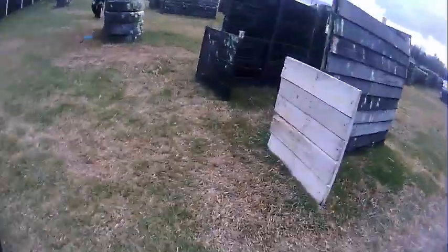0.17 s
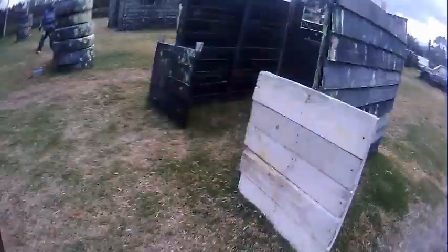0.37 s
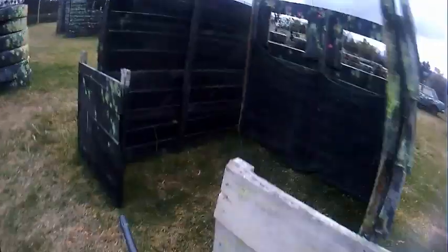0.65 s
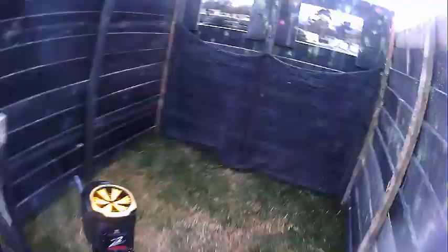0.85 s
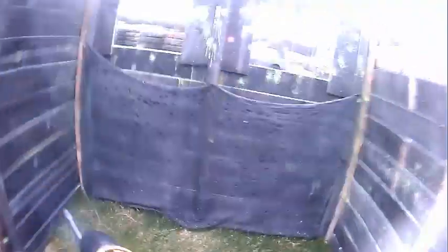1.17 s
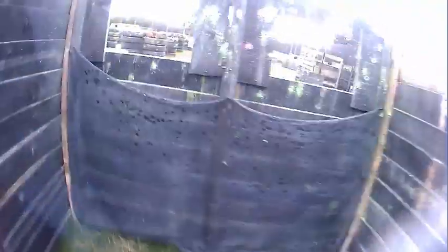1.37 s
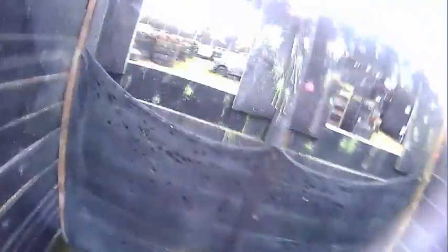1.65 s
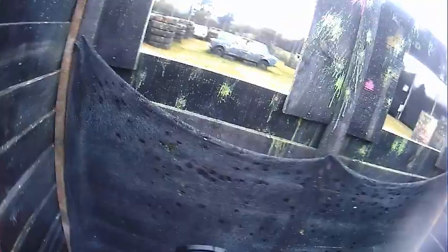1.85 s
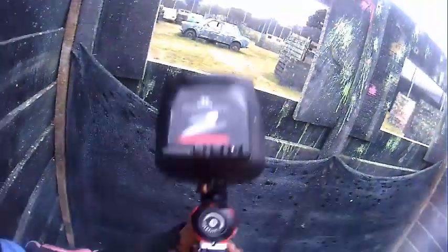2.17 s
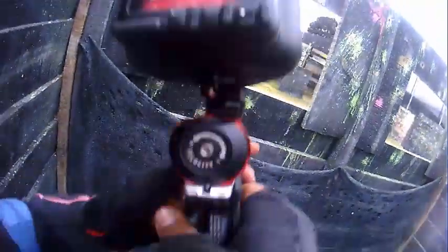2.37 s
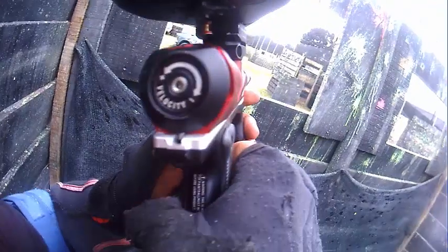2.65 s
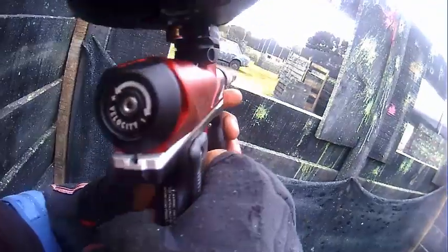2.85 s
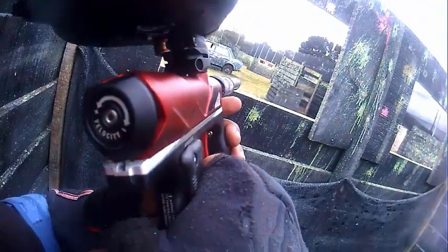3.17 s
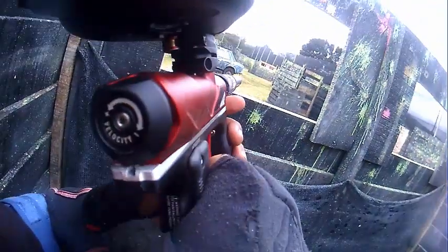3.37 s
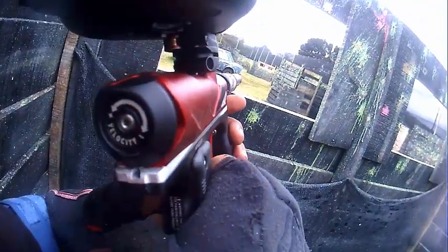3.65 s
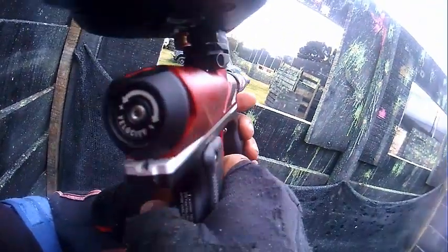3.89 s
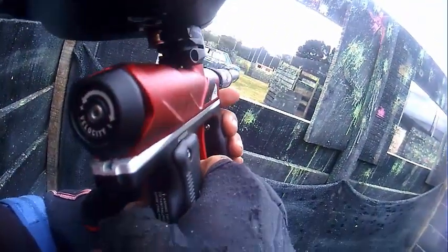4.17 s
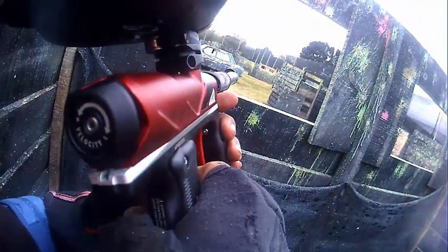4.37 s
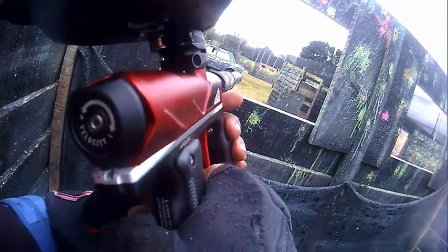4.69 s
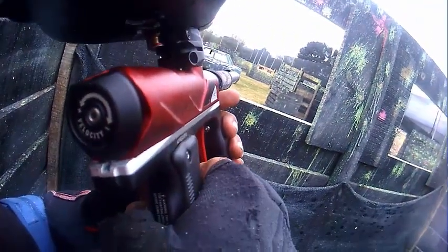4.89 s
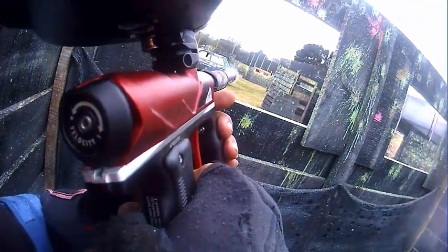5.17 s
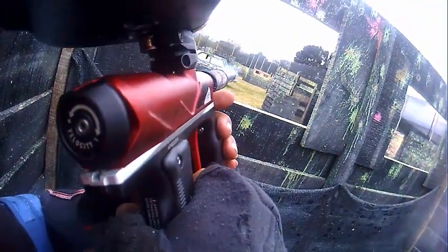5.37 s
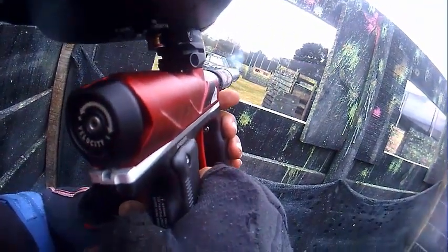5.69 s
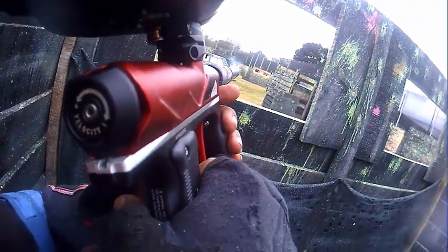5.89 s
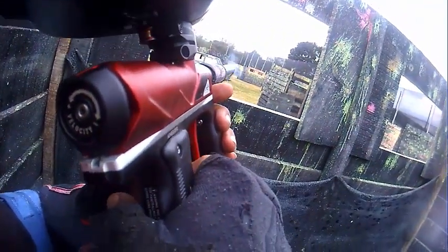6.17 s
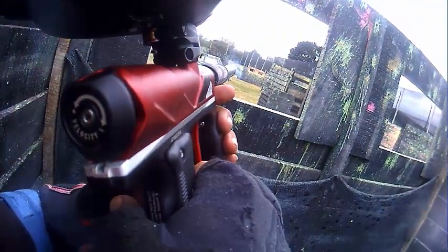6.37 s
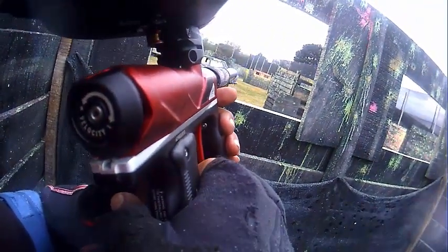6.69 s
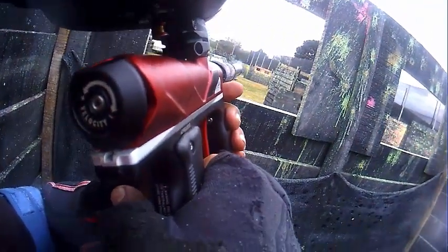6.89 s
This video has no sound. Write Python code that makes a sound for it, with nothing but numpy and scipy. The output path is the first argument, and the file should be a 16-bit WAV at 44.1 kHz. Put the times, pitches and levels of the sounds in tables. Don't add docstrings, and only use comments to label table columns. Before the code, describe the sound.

Outdoors, then within a small wooden hut. Gritty rubbing and thumps on the microphone's case come first, easing while far-off paintball shots tap softly in even bursts. Strap clicks peak as the marker is raised, then it is nearly still with light wind. Finally the near marker hammers out a rapid string until the end, each shot a short low thump with metallic clank and hiss, in gritty, lo-fi sound.

```python
import sys
import numpy as np
from scipy import signal
from scipy.io import wavfile

SR = 44100
rng = np.random.default_rng(int(sys.argv[2]) if len(sys.argv) > 2 else 0)


def master(y):
    cut = np.clip(np.atleast_2d(y).T, -1, 1)
    pcm = np.round(cut * 32767)
    wavfile.write(sys.argv[1], SR, pcm.astype(np.int16))


def level_to_linear(level):
    exponent = np.asarray(level, float) / 20
    return 10 ** exponent


N = 310023

# t/s, strength level/dB, ball delay/ms, sharp gas level/dB, barrel ring level/dB
SHOTS = [(5.1100, 0.8, 0.055, -2.5, 1.5), (5.2596, 0.9, 0.073, -2, -1.3), (5.4653, -0.3, 0.16, 3, -0.6),
         (5.6124, 0, 0.54, -1.1, -2.5), (5.7345, 0, .05, 1.5, 2.1), (5.8463, 0.5, 0.057, -0.5, .1),
         (5.9635, 1.2, 0.046, 1, 0.4), (6.0884, -0.4, 0.39, 2.5, -0.2), (6.2202, -0.8, .05, -0.5, 0.1),
         (6.346, -0.6, 0.06, 1.5, 1.5), (6.468, -0.7, 0.044, 4, 1.5), (6.5803, 1, 0.068, -1.7, 0.5),
         (6.71, -0.6, 0.027, -2, -1.5), (6.825, -0.2, .05, 1, -5.5), (6.953, 0.6, 0.43, 6, -5)]
# f/Hz, signed swing/1, T60/s, delay after valve/ms (the ball leaves at about 3 ms)
BOOM = [
    (192, -.85, .073, .1),
    (520, -.26, .056, 2.3),
    (107, 1.35, .045, 2.95),
    (167, -.33, .091, 2.9),
    (222, -.43, .117, 4.3),
    (305, .46, .06, 3.25),
    (355, -.7, .057, 3.4),
]
# f/Hz, level/dB, T60/s, delay after valve/ms
METAL = [
    (465, -22, 0.079, 2.7),
    (598, -33, 0.14, 2.91),
    (714, -29, 0.049, 2.96),
    (1423, -23, 0.051, 9.0),
    (1720, -12, 0.037, 2.508),
    (1819, -16, 0.066, 2.956),
    (2132, -17, 0.045, 2.817),
    (2290, -31.5, 0.062, 2.98),
    (2840, -15.5, 0.0065, 1.785),
]
# f/Hz, bandwidth/Hz, level/dB, T60/s
BLAST = [
    (617, 330, -26.5, 0.13),
    (1690, 900, -27, 0.11),
    (2916, 890, -18.5, 0.026),
    (3500, 5800, -31, 0.024),
]
# time from valve opening/ms, level/dB
CYCLE = [
    (-9.5, -23),
    (18, -16.5),
    (28.5, -31),
    (36.5, -29.5),
]
SHARP_HZ = 2500

# t/s, peak level/dB
LOADER = [(5.373, -30), (5.395, -32), (5.4292, -21), (5.5764, -24), (5.8102, -37), (5.9284, -27),
          (6.0671, -27), (6.1502, -25), (6.282, -33), (6.539, -19.5), (6.77, -25), (6.8663, -19)]
# t/s, peak level/dB
TICKS = [(0.0183, -22.5), (0.0404, -27), (0.1837, -28), (0.285, -30), (0.5327, -26.5), (0.7104, -23),
         (0.7981, -43), (1.042, -34), (1.1938, -27), (1.6153, -42), (1.713, -31), (1.87, -29),
         (1.9202, -37), (2.0233, -38), (2.2274, -31), (2.3281, -28), (2.369, -45), (2.4204, -16.5),
         (2.4643, -16), (2.5025, -18.5), (2.584, -44), (2.618, -33), (2.673, -43), (2.6998, -22.5),
         (2.7831, -26.5)]
# start t/s, hold/s, level/dB, brightness/dB,
# upper ring f/Hz
STROKES = [(0.0, .005, -34.5, -2, 1670), (0.046, .02, -37.5, 0, 1640), (0.077, 0.027, -29.5, 0.5, 1690),
           (0.204, 0.064, -32.5, 0, 1630), (0.29, .07, -32, -9.5, 1585), (0.38, 0.075, -39, -7.5, 1640),
           (0.485, .12, -34.5, -7.5, 1650), (0.621, 0.084, -33.5, -3.5, 1730),
           (0.8, 0.099, -28.5, -11.5, 1556), (1.028, 0.14, -44, -8, 1660), (1.179, .1, -41.5, -11.5, 1500),
           (1.403, 0.0066, -39, -14.5, 1760), (1.456, 0.26, -56, -5, 1740), (1.727, 0.046, -35, -15, 1720),
           (1.778, 0.077, -29, -19.5, 1700), (1.868, 0.058, -40.5, -12, 1740), (2.022, .11, -42, -9, 1750),
           (2.18, 0.085, -51, -3, 1730), (2.331, 0.037, -35.5, -13, 1725),
           (2.38, 0.018, -22.5, -13.5, 1720), (2.426, 0.016, -27.5, -10, 1780),
           (2.47, .04, -35.5, -5.5, 1720), (2.552, 0.23, -51, 0.5, 1610),
           (2.86, 0.42, -61.5, 1, 1590), (3.62, 0.21, -63.5, 5, 1700), (4.64, .15, -69.5, 8, 1650),
          (4.9, 0.095, -56, -11, 1684), (5.32, .05, -46, -3, 1740), (5.38, 0.16, -38, -3, 1700),
          (5.54, .07, -40, -9, 1710), (5.66, 0.079, -41.5, -10, 1700), (5.8, 0.072, -37.5, -6, 1690),
          (5.89, 0.21, -39.5, -4.5, 1660), (6.13, 0.18, -49, -6, 1720), (6.4, .2, -39.5, -7, 1660),
          (6.63, 0.19, -43.5, -4, 1680), (6.85, .2, -39.5, -2.5, 1700)]
STROKE_RISE_DB_PER_S, STROKE_FALL_DB_PER_S = 600, 235
LOW_RING_HZ, UPPER_REST_HZ, LOW_RING_LAW = 468, 1670, -0.47
# share taken from the dull level/1, offset/dB, resting level/dB
RUB_MIX = [
    (0.97, -0.73, -64),
    (0.0, -0.75, -79),
    (0.67, -20, -69),
    (0.17, -7.5, -71),
]
# multiple of the ring/1, bandwidth/Hz, level/dB
CASE_LOW = [
    (1.0, 99, 12.5),
    (1.35, 660, -8),
    (.75, 45, -8),
]
# multiple of the ring/1, bandwidth/Hz, level/dB
CASE_HIGH = [
    (1.0, 141, 5.5),
    (1.17, 350, -9),
]
# multiple of 1280 Hz/1, bandwidth/Hz, level/dB
CASE_MIDDLE = [
    (0.94, 510, -2),
    (0.623, 79, 2.5),
]

# t/s, signed swing/1, f/Hz
KNOCKS = [(.002, -0.25, 57.7), (.107, 0.47, 101), (0.1272, -0.3, 86), (0.378, 0.28, 64.6),
          (0.441, -0.18, 213), (0.602, -0.12, 77), (1.57, -0.2, 82), (1.689, -0.39, 202),
          (1.6903, 0.55, 70), (1.76, 0.19, 90), (1.9942, 0.17, 286), (2.386, 0.26, 480), (2.828, 0.099, 90)]
# t/s, peak level/dB, crack level/dB
FAR = [(1.0305, -24.5, -56), (1.176, -20, -71), (1.299, -28, -58.4), (1.415, -27, -58),
       (1.5132, -22.5, -55), (1.616, -23.5, -52), (2.7492, -24.5, -46), (2.8642, -21, -50.5),
       (2.9667, -24.5, -50.5), (3.068, -23, -47), (3.1701, -21.5, -53), (3.2733, -22.5, -49.5),
       (3.6205, -23, -52), (3.724, -25, -51), (3.8354, -25, -67), (3.939, -26.5, -52), (4.1772, -23, -51.5),
       (4.2788, -22.5, -54), (4.4996, -22, -49), (4.602, -23.5, -52.5), (4.651, -16, -42),
       (4.8445, -21.5, -57), (4.9474, -22, -51.5)]
# t/s, level/dB
BREEZE = [(0.0, -26.5), (0.45, -30.5), (0.93, -32.5), (1.0, -43), (1.4, -36.5), (2.2, -42.5), (2.7, -39.5),
          (2.9, -34), (3.5, -38), (4.0, -35.5), (4.43, -40), (4.75, -34.5), (5.05, -36), (5.3, -31),
          (5.8, -38), (6.2, -34), (6.66, -29), (7.03, -29.5)]
BREEZE_UPPER_DB = -13.5
# start t/s, hold/s, level/dB, brightness/dB
JOLTS = [(0.0, 0.0043, -14.5, -23), (0.12, 0.022, -20, 4.5), (0.22, 0.24, -34, 4.5),
         (0.38, .01, -25.5, -13), (0.61, 0.027, -23.5, -10), (0.7, 0.06, -29, -19), (1.02, 0.089, -29, -24),
         (1.17, 0.024, -32, -16), (1.31, 0.0092, -46, 1), (1.43, 0.006, -35, 4.5), (1.5, .06, -35.5, 3),
         (1.6, 0.11, -22, -12), (1.69, 0.023, -19.5, -10), (1.78, .02, -29.5, -6), (1.96, 0.099, -28.5, -8),
         (2.04, .08, -23.5, -15), (2.125, 0.013, -28, -15), (2.18, 0.29, -36, 5), (2.55, 0.0056, -32, -12),
         (2.6, .08, -48, 14), (2.66, 0.053, -33, -9), (2.84, .03, -34, -12), (3.75, 0.088, -46, 2),
         (5.2, .1, -45, 9), (5.5, .03, -33, -11), (5.6, 1, -43, 8)]
JOLT_RISE_DB_PER_S, JOLT_FALL_DB_PER_S = 256, 205
# low f/Hz, high f/Hz, level/dB
FIELD = [
    (90, 178, -50),
    (213.5, 334, -50.5),
    (336, 950, -62),
    (910, 1780, -64.5),
    (1440, 2120, -66),
    (1900, 3950, -64.5),
]

# f/Hz, bandwidth/Hz, share removed/1
PORT_NOTCH = (1047, 370, 0.45)
CLOCK_HZ, CUTOFF_HZ = 8000, 11500


def marker():
    s, db, ball_ms, sharp_db, barrel_db = np.transpose(SHOTS)

    def vary(spread_db):
        return spread_db * rng.standard_normal(len(s))

    out = np.zeros(N)
    for hz, swing, t60, late_ms in BOOM:
        ball_delay_ms = ball_ms * (late_ms > 1)
        blows = clicks(s + (late_ms + ball_delay_ms) / 1000, swing * level_to_linear(db + vary(1)))
        out += ring(blows, hz, t60)
    out = signal.lfilter([.09], [1, -.91], out)

    for hz, mode_db, t60, late_ms in METAL:
        shot_db = sharp_db if hz > SHARP_HZ else barrel_db
        blows = clicks(s + (late_ms + ball_ms) / 1000, level_to_linear(db + mode_db + shot_db + vary(2)))
        out += ring(blows, hz, t60)

    ragged = level_to_linear(2.7 * drift(150))
    for hz, width_hz, gas_db, t60 in BLAST:
        push_db = db + sharp_db * (hz > SHARP_HZ)
        valve_puffs = clicks(s + 0.000127, level_to_linear(push_db - 9.5))
        muzzle_puffs = clicks(s + .0028 + ball_ms / 1000, level_to_linear(push_db))
        puffs = valve_puffs + muzzle_puffs
        envelope = fade(puffs, t60) + level_to_linear(-26) * fade(puffs, 4.1 * t60)
        hiss = rms_one(resonance(rng.standard_normal(N), hz, width_hz))
        out += level_to_linear(gas_db) * resonance(hiss * ragged * envelope, hz, 1.33 * width_hz)

    parts = np.zeros(N)
    for ms, part_db in CYCLE:
        parts += clicks(s + (ms + vary(0.805)) / 1000, level_to_linear(part_db + vary(2)))
    rattle = knock(parts, 404, 0.031) + level_to_linear(-0.5) * knock(parts, 610, 0.012)
    return out - rattle + level_to_linear(-10.5) * tick(parts, crack_db=4.5)


def knock(x, hz, t60):
    return signal.lfilter([.0225], [1, -1.7, .7225], ring(x, hz, t60))


def tick(x, crack_db):
    crack = band(rng.standard_normal(N) * fade(x, 0.032), 1650, 3570)
    return ring(x, 1754, 0.032) + ring(x, 617, 0.016) + level_to_linear(crack_db) * crack


def rubbing():
    strokes = STROKES
    dull_db, bright_db = swells(strokes, STROKE_RISE_DB_PER_S, STROKE_FALL_DB_PER_S)
    gains = []
    for share, offset_db, rest_db in RUB_MIX:
        layer_db = share * dull_db + (1 - share) * bright_db + offset_db
        gains.append(np.hypot(level_to_linear(layer_db), level_to_linear(rest_db)))

    high_hz, = in_time([(s + hold / 2, hz) for s, hold, _, _, hz in strokes])
    low_hz = LOW_RING_HZ * (high_hz / UPPER_REST_HZ) ** LOW_RING_LAW
    still = np.ones(N)
    layers = [(CASE_LOW, low_hz), (CASE_HIGH, high_hz), ([(0.86, 2400, 0)], 2900 * still),
              (CASE_MIDDLE, 1280 * still)]
    out = np.zeros(N)
    clumps = drift(51)
    for (modes, hz), gain in zip(layers, gains):
        sizes = level_to_linear(2.47 * np.minimum(rng.exponential(1, N), 5)) * rng.choice([-1, 1], N)
        happens = rng.random(N) < 2500 / SR
        slips = sizes * happens * level_to_linear(0.83 * clumps + 2.55 * drift(64))
        rung = np.zeros(N)
        for k, (times, width_hz, mode_db) in enumerate(modes):
            rung += level_to_linear(mode_db) * (-1) ** k * moving_resonance(slips, times * hz, width_hz)
        out += gain * rms_one(band(rung, 0.45 * hz.min(), min(1.39 * hz.max(), 3900)))
    return out + tick(small_blows(TICKS), crack_db=-29) + tick(small_blows(LOADER), crack_db=-6)


def small_blows(rows):
    s, db = np.transpose(rows)
    return clicks(s + 0.000984, level_to_linear(db - 8.5))


def knocks():
    return sum(knock(clicks([s], swing), hz, 3.7 / hz) for s, swing, hz in KNOCKS)


def far_markers():
    s, db, crack_db = np.transpose(FAR)
    pops = clicks(s + 0.00051, level_to_linear(db + 2.0))
    valve = knock(clicks(s - .005, level_to_linear(db + 1.5)), 264, 0.024)
    body = knock(pops, 104.6, 0.045) + level_to_linear(-15.5) * knock(pops, 260, 0.011) - level_to_linear(-8.5) * valve
    tail = rms_one(band(rng.standard_normal(N), 89, 343)) * fade(pops, 0.16)
    crack_envelope = fade(clicks(s, level_to_linear(crack_db + 5.5)), 0.027) + fade(clicks(s, level_to_linear(crack_db - 13.5)), 0.43)
    crack = rms_one(band(rng.standard_normal(N), 1350, 2150)) * crack_envelope
    slap = rms_one(band(rng.standard_normal(N), 570, 730)) * fade(clicks(s - .004, level_to_linear(db)), 0.014)
    return body + band(level_to_linear(-20.0) * tail + level_to_linear(-22.5) * slap + crack, 60, 2160)


def wind():
    breeze_db, = in_time(BREEZE)
    deep_db, upper_db = swells(JOLTS, JOLT_RISE_DB_PER_S, JOLT_FALL_DB_PER_S)
    deep = band(rng.standard_normal(N) * level_to_linear(2 * drift(7.5)), 13.3, 74.4)
    upper = band(rng.standard_normal(N) * level_to_linear(6.6 * drift(11.6)), 103.6, 129)
    upper += level_to_linear(-7) * band(rng.standard_normal(N), 118, 310)
    deep_gain = np.hypot(level_to_linear(deep_db), level_to_linear(breeze_db))
    upper_gain = level_to_linear(-8.0) * np.hypot(level_to_linear(upper_db), level_to_linear(breeze_db + BREEZE_UPPER_DB))
    return deep_gain * rms_one(deep) + upper_gain * rms_one(upper)


def field():
    out = np.zeros(N)
    for low_hz, high_hz, db in FIELD:
        out += level_to_linear(db) * rms_one(band(rng.standard_normal(N), low_hz, high_hz, order=3))
    return out


def rms_one(x):
    return x / np.sqrt(np.mean(x ** 2) + 1e-20)


def in_time(rows):
    s, *columns = np.transpose(rows)
    return [np.interp(np.arange(N) / SR, s, c) for c in columns]


def clicks(times, sizes):
    out = np.full(N, 1e-18)
    places = np.round(np.asarray(times) * SR).astype(int)
    np.add.at(out, np.clip(places, 0, N - 1), sizes)
    return out


def fade(x, t60):
    return signal.lfilter([1], [1, -level_to_linear(-60 / (t60 * SR))], x)


def ring(x, hz, t60):
    r, w = level_to_linear(-60 / (t60 * SR)), 2 * np.pi * hz / SR
    return signal.lfilter([0, np.sin(w)], [1, -2 * r * np.cos(w), r * r], x)


def resonance(x, hz, width_hz):
    r = np.exp(-np.pi * width_hz / SR)
    poles = [1, -2 * r * np.cos(2 * np.pi * hz / SR), r * r]
    return signal.lfilter(np.array([1, 0, -1]) * (1 - r * r) / 2, poles, x)


def moving_resonance(x, hz, width_hz):
    turn = np.exp(2j * np.pi * np.cumsum(hz) / SR)
    r = np.exp(-np.pi * width_hz / SR)
    return 2 * np.real(signal.lfilter([1 - r], [1, -r], x / turn) * turn)


def band(x, low_hz, high_hz, order=2):
    return signal.sosfilt(signal.butter(order, [low_hz, high_hz], "band", fs=SR, output="sos"), x)


def drift(rate):
    r = np.exp(-2 * np.pi * rate * 40 / SR)
    noise = rng.standard_normal(N // 40 + 2002)
    slow = signal.lfilter([1], [1, -2 * r, r * r], noise)[2000:]
    return np.interp(np.arange(N) / 40, np.arange(len(slow)), rms_one(slow - slow.mean()))


def swells(rows, rise_db, fall_db):
    t = np.arange(0, N, 40) / SR
    start, hold, db, bright_db = np.array([row[:4] for row in rows]).T[:, :, None]
    climb = rise_db * np.maximum(start - t, 0)
    sink = fall_db * np.maximum(t - start - hold, 0)
    shape = db - climb - sink
    levels = []
    for event_db in (shape, shape + bright_db):
        total_db = 10 * np.log10(np.sum(level_to_linear(2 * event_db), axis=0) + 1e-30)
        levels.append(np.interp(np.arange(N) / SR, t, total_db))
    return levels


def scene():
    return (marker() + rubbing() + knocks() + far_markers() + wind() + field())[None]


def top_cut(x):
    return signal.sosfilt(signal.butter(12, 11100, fs=SR, output="sos"), x)


def record(dry):
    hz, width_hz, share = PORT_NOTCH
    x = dry - share * resonance(dry, hz, width_hz)
    x = signal.sosfilt(signal.butter(8, CLOCK_HZ / 2, fs=SR, output="sos"), x)
    x = np.clip(x, -1, 1)
    ticks = np.floor(np.arange(N) * CLOCK_HZ / SR) * SR / CLOCK_HZ
    held = np.interp(ticks, np.arange(N), x[0])[None]
    held = signal.sosfilt(signal.cheby2(12, 45, CUTOFF_HZ, fs=SR, output="sos"), held)
    mix = np.clip(held, -1, 1)
    return top_cut(mix)


dry = scene()
out = record(dry)
master(out)
```